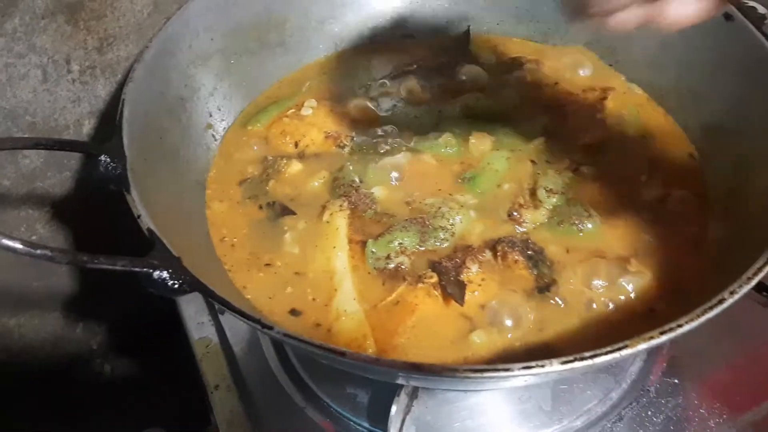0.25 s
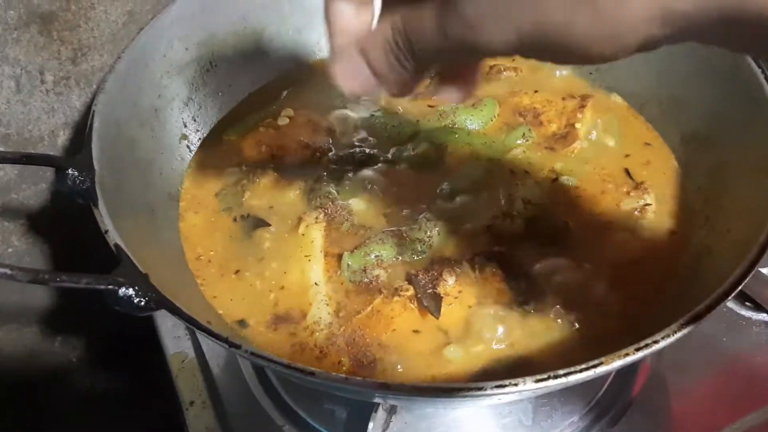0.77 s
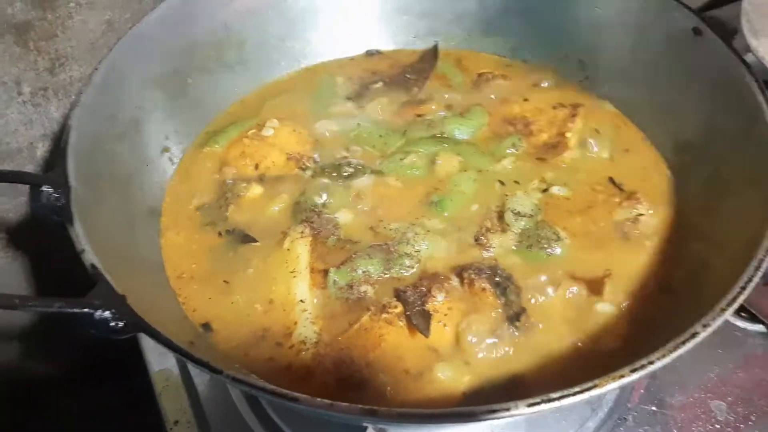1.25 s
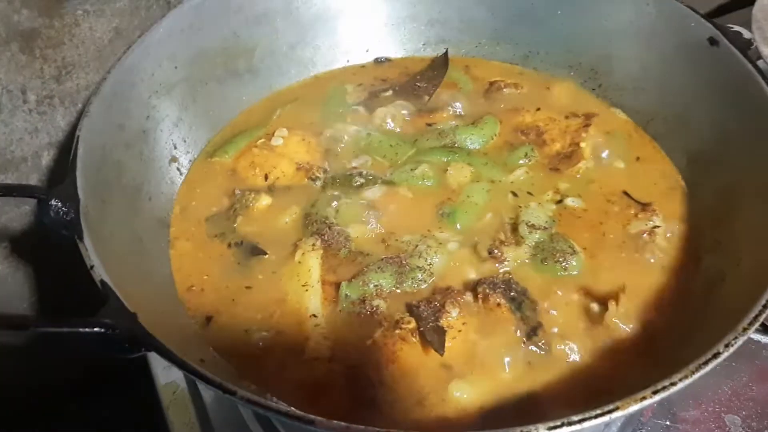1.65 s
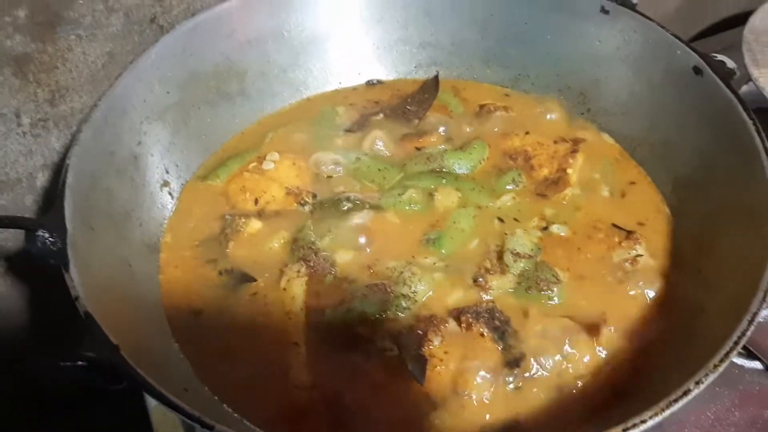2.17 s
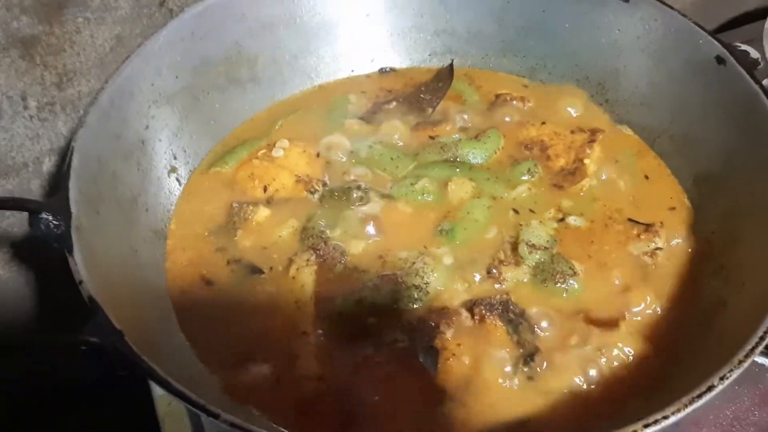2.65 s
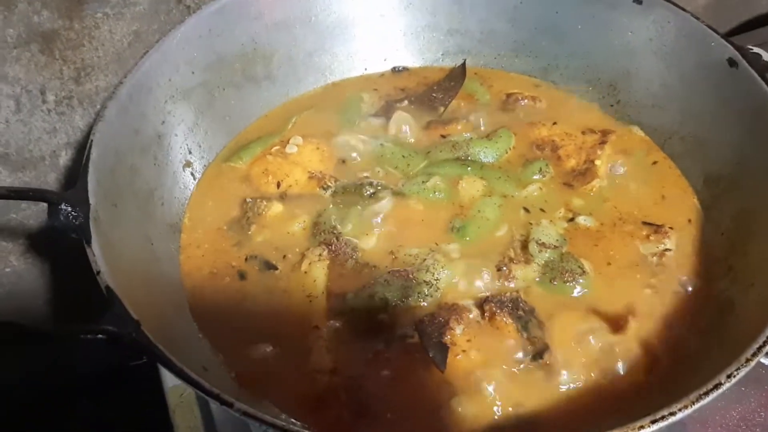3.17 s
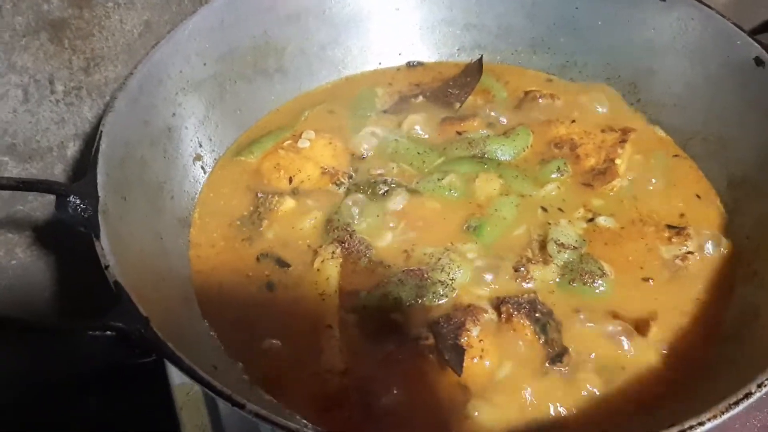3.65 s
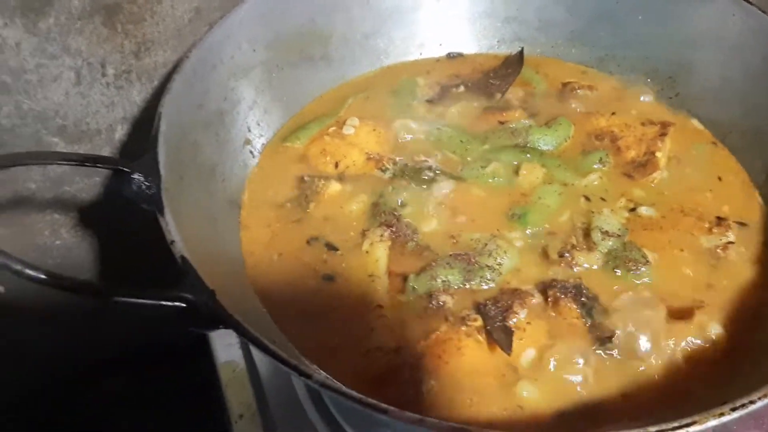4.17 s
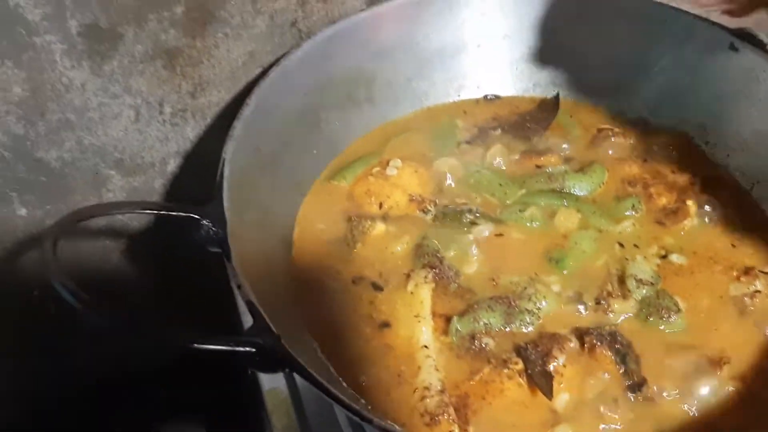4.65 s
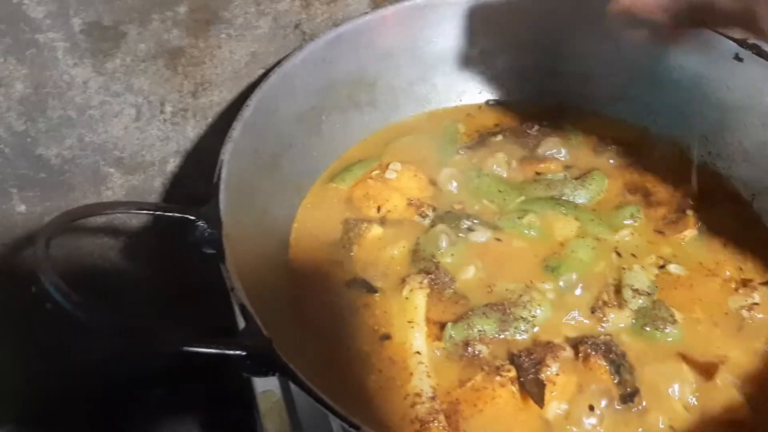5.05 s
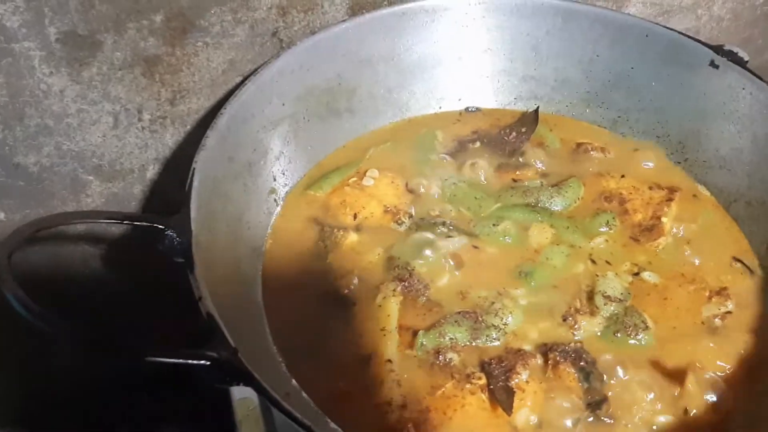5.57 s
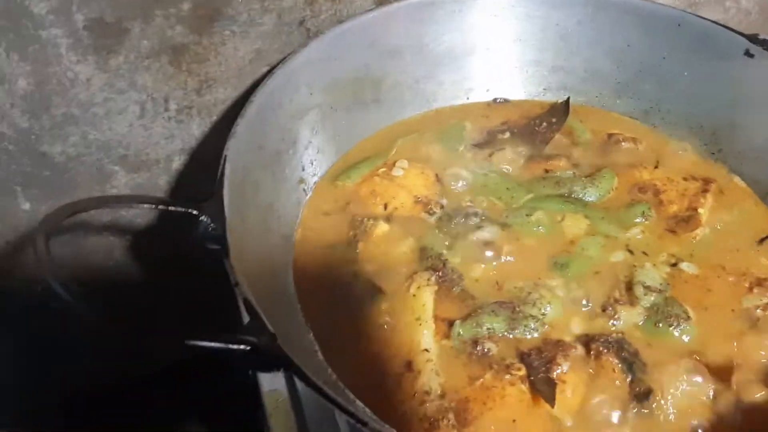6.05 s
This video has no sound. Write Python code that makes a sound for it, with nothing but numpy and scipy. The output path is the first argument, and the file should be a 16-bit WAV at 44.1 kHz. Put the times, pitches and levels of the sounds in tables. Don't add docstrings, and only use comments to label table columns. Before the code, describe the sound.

A thin curry simmers briskly in a steel bowl pan, heard close in stereo for just over six seconds. From the start, dense irregular bubbles burst as short rising plops, some hollow and mid-pitched, others small, high and glassy, each ringing briefly in the bowl. Faint fizzing fills the gaps and a soft, low gas roar hums steadily below. Very sharp, bright spits crack at about 2.2 and 2.3 seconds. Across the softly echoing kitchen, dull knocks fall near 1.9, 3.1 and 3.5 seconds, with a brief buzzy metal clink at 3.2. The hardest knock comes at 4.25. The spitting hiss grows livelier around 4.8 to 5.1, then eases. Between 5.65 and 5.95 low, lumpy puffs of air brush the right microphone. A deep soft knock and a fainter one follow around 6.1, and the bubbling continues to the end.

```python
import sys
import numpy as np
from scipy import signal
from scipy.io import wavfile
from scipy.ndimage import uniform_filter1d

SR = 44100
rng = np.random.default_rng(int(sys.argv[2]) if len(sys.argv) > 2 else 0)


def ratio(d):
    e = np.asarray(d, float) / 20
    return 10 ** e


def log_audio(samples):
    frames = np.atleast_2d(samples).T
    limited = np.clip(frames, -1, 1)
    pcm = np.round(limited * 32767).astype(np.int16)
    wavfile.write(sys.argv[1], SR, pcm)


N = 278258

# t/s, level/dB
SIMMER_VIGOUR = [(0.0, -66.5), (1.83, -67.5), (1.93, -63), (2.35, -65.5), (2.65, -59), (2.95, -60.5),
                 (3.27, -57.5), (4.04, -64), (4.66, -58.5), (4.8, -51.5), (4.94, -53.5), (5.08, -56),
                 (5.22, -63), (5.41, -63.5), (5.76, -59.5), (6.31, -62)]
# t/s, peak level/dB, f/Hz
LOUD_LARGE_BUBBLES = [(0.391, -44, 1090), (0.659, -29.5, 1210), (0.784, -36, 845), (1.117, -34, 855),
                      (1.161, -37, 1090), (1.329, -29, 907), (1.441, -27, 1150), (1.463, -33.5, 918),
                      (1.597, -31.5, 1210), (2.256, -29, 1225), (2.375, -33, 1210), (2.402, -31, 1165),
                      (2.606, -30, 1340), (2.717, -36, 1260), (2.813, -30.5, 1210), (2.94, -29.5, 1013),
                      (3.038, -30, 1010), (3.391, -59, 1210), (3.493, -33, 1280), (3.72, -38, 910),
                      (3.891, -31.5, 1176), (3.992, -33, 920), (4.696, -38, 950), (5.124, -60, 1200),
                      (5.295, -39, 1210), (5.501, -31, 1210), (5.59, -27.5, 1240), (5.95, -29.5, 1120),
                      (6.056, -34, 1030), (6.267, -26.5, 1010),
                      (0.0503, -28, 1900), (0.1858, -27, 2040), (0.22, -25, 1680), (0.2853, -31, 1580),
                 (0.938, -33, 1680), (0.9813, -26, 1650), (1.2141, -32.5, 2030), (1.3823, -29.5, 1930),
                 (1.4098, -27.5, 1680), (1.6192, -29.5, 1850), (1.68, -24, 1880), (2.0268, -31, 2030),
                 (2.284, -31.5, 2040), (2.6226, -22, 1503), (2.7758, -27, 1530), (3.3653, -20.5, 1670),
                 (3.5159, -22.5, 1970), (4.1598, -23, 1780), (4.5024, -31.5, 2040), (4.6217, -30, 1630),
                 (4.673, -32, 1490), (4.8973, -24.5, 1810), (5.1397, -30, 2040), (5.2016, -22.5, 2040),
                 (5.3497, -26.5, 1960), (5.3717, -28, 1880), (5.4675, -27.5, 1960), (5.6471, -24, 1580),
                 (5.8411, -26.5, 1970), (6.1878, -31, 1970)]
# t/s, peak level/dB, f/Hz
SMALL_BUBBLES = [(0.1052, -19, 3380), (0.3653, -26.5, 4620), (0.9433, -35, 3160), (1.4626, -23, 2950),
                 (2.0672, -46, 2660), (2.121, -29, 3970), (2.5027, -23, 4530), (2.7911, -43, 2830),
                 (2.8734, -28, 4200), (2.9444, -24, 3440), (3.0672, -22.5, 4800), (3.2999, -24, 3270),
                 (3.4112, -27, 3580), (3.552, -20, 4800), (3.898, -32, 3100), (4.0432, -28.5, 2580),
                 (4.242, -23.5, 2800), (4.473, -24, 3800), (4.5271, -32, 3870), (4.6214, -20, 4550),
                 (4.7571, -29, 2790), (4.8623, -31, 2920), (4.906, -25, 2560), (4.982, -27, 3260),
                 (5.091, -28, 2640), (5.3834, -22, 2520), (5.4284, -32, 3320), (5.6481, -30, 3630),
                 (5.8415, -18, 2520), (5.9553, -31, 2570)]
# t/s, peak level/dB, f/Hz
SPITTING_DROPS = [(0.9562, -33, 9680), (1.2126, -32.5, 11400), (1.299, -36.5, 6070), (1.4227, -37, 8950),
                  (1.5242, -26.5, 6860), (1.9884, -37, 10800), (2.2393, -14.5, 13800), (2.2987, -18, 10700),
                  (2.465, -31, 6700), (2.578, -24.5, 5900), (3.1682, -43, 5660), (3.3244, -30, 12600),
                  (3.415, -25, 5600), (3.6007, -24.5, 5950), (4.619, -35, 11900), (4.7872, -30, 7100),
                  (5.0539, -28, 6340), (5.1183, -21.5, 6900), (5.2006, -31, 11500), (5.235, -32, 10500),
                  (5.4055, -29, 12200), (5.6002, -31.5, 6600), (5.884, -27.5, 5800), (6.2971, -27, 6420)]
BUBBLES_DB, HISS_DB = -43.5, -60.5
BUBBLES_FOLLOW = .2
SPIT_LAG_S = .0008

# f/Hz, width/Hz, level/dB
BOWL_RINGS = [(910, 19, -24), (1210, 45, -0.5), (1460, 58, 3), (1900, 12, -18), (2040, 42, 5)]
# f/Hz, level/(dB per Hz)
FIZZ_COLOUR = [(240, -44), (400, -0.5), (626, -2.5), (839, -1), (1310, -4.5), (1510, -3), (1990, -4),
               (2180, -10), (3530, -15.5), (4950, -20.5), (8500, -35.5), (11400, -18), (16000, -26.5)]

# t/s, level/dB
FLAME_DRAUGHT = [(0.0, -46), (1.67, -46.5), (1.86, -46), (2.86, -44.5), (3.2, -46), (3.5, -46), (5.45, -45),
                 (5.78, -43.5), (6.31, -48)]
# f/Hz, level/(dB per Hz)
FLAME_ROAR = [(12, -67), (20, -38), (46, -6.5), (75, 1), (125, -2.5), (156, -15), (210, -7), (287, -9.5),
              (435, -12.5), (621, -8.5), (700, -29), (910, -41), (1540, -120)]
# f/Hz, width/Hz, level/dB
FLAME_HUM = [(55.3, 19.4, -4), (80.2, 15.4, 0.5), (114.6, 22, -2.5), (213.6, 27, -2.5), (269, 50, -7),
             (334, 28.5, -6.5), (422.3, 28, -6)]

# t/s, peak level/dB, rise time/s, rattle length/s, depth of tone (extra bass)/dB
KNOCK_BLOWS = [
    (1.899, -27.5, 0.011, 0.02, -5),
    (3.068, -30.5, 0.0037, 0.032, -2),
    (3.541, -26.5, 0.0043, 0.062, 4.5),
    (4.2547, -20.5, 0.0015, 0.039, -2.5),
    (6.094, -27, 0.014, 0.056, 5),
    (6.174, -39, 0.013, 0.0069, -11),
]
# f/Hz, width/Hz, level/dB
BOARD_RINGS = [(228, 19.7, 5.5), (259.7, 12.4, 3), (322.5, 16, 6.5), (427.6, 26, 6), (651, 24.6, 2),
               (780, 12.5, -2), (847, 6.3, -7.5), (1090, 19, -15.5), (1240, 37, -23)]
# f/Hz, level/(dB per Hz)
KNOCK_CRASH = [(88, -51), (150, -22), (182, -25), (217, -44), (328, -65), (514, 8), (649, -22), (790, -2.5),
               (2600, -14), (16000, -38.5)]
SHARP_T60_S, T60_LOST_PER_RISE = 0.43, 18.2
BRIGHT_DB, BRIGHT_PER_PEAK_DB, BRIGHT_PER_DEPTH_DB = -0.5, 0.8247, 0.1748
DULLING_DB_PER_S_OCTAVE = 40

# f/Hz, width/Hz, level/dB
CLINK_RINGS = [(1050, 120, -3), (1620, 240, -4), (2230, 73, 8.5), (2820, 210, -7.5), (3530, 600, -16.5)]
CLINK_S, CLINK_DB, CLINK_HOLD_S = 3.162, -24.5, 0.059

# middle t/s, level/dB, half length/s
PUFF_GUSTS = [
    (5.695, -27.5, 0.028),
    (5.762, -25, 0.0083),
    (5.789, -22, 0.014),
    (5.846, -36, 0.017),
    (5.895, -27.5, 0.035),
    (5.934, -37, 0.03),
]

# f/Hz, likeness (-1 opposite to 1 same)
LEFT_RIGHT_LIKENESS = [(60, 0.85), (130, 1), (290, 0.83), (640, 0.64), (1410, 0.15), (3100, 0.25),
                       (6820, -0.37), (15000, 0.28)]
# f/Hz, level/dB
LEFT_RIGHT_LEAN = [(30, -2), (300, -3.5), (1200, -3), (14000, -2)]
KITCHEN_T60_S, WALL_CUT_HZ = 0.28, 8900


def bursts(rows, cycles, rise, spread_s, swell):
    out = np.zeros((2, N))
    chance = rng.uniform(-1, 1, (len(rows), 3))
    for (s, db, hz), (where, long, up) in zip(rows, chance):
        t = np.arange(round((1.4 * cycles / hz + 2 * spread_s) * SR)) / SR
        arrival_s = spread_s * (1 + where * np.array([[1], [-1]]))
        age = np.maximum(t - arrival_s, 0) * hz
        fade = ratio(-60 * age / (cycles * ratio(2.75 * long)))
        onset = 1 - np.exp(-age / swell)
        tone = np.sin(2 * np.pi * age * (1 + rise * (1 + up) * age))
        add(out, s - spread_s, ratio(db) * sides(-2.4 - 1.0 * where) * fade * onset * tone)
    return out


def unseen_bubbles(level_db, per_s, low_hz, high_hz, spread_db):
    gaps, pitch, strength = rng.random((1500, 3)).T
    s = .01 + np.cumsum(-np.log(1 - gaps)) / per_s
    simmer_db = level_db[np.minimum(s * SR, N - 1).astype(int)]
    db = simmer_db + spread_db * np.minimum(-np.log(1 - strength), 2.0)
    hz = low_hz * (high_hz / low_hz) ** pitch
    return np.transpose([s, db, hz])[s < (N - 1) / SR]


def in_bowl(x, loud, ring_db):
    right_rings = np.array(BOWL_RINGS) * [1.015, 1, 1]
    rings = np.array([resonances(loud[0], BOWL_RINGS), resonances(loud[1], right_rings)])
    x = x + loud
    echo = np.array([np.roll(x[1], round(.0031 * SR)), -np.roll(x[0], round(.0043 * SR))])
    return x + ratio(ring_db) * rings + ratio(-14.5) * echo


def splashes(rows, hz, t60, octaves):
    s, db, burst_hz = np.transpose(rows)
    nearness = np.exp(-.5 * (np.log2(burst_hz / hz) / octaves) ** 2)
    jumps = np.full(N, 1e-18)
    jumps[(s * SR).astype(int)] = ratio(db) * nearness
    return signal.lfilter([1], [1, -ratio(-60 / (t60 * SR))], jumps)


def fizz(rows, bubbles_db, hiss_db):
    grain = drift(53)
    seethe, hiss, rows = ratio(bubbles_db - 6.5), ratio(hiss_db + 12), np.array(rows)

    def shape(hz):
        spray_db = np.interp(np.log2(hz / 1000), [0, 1, 2, 3, 4], [-12, -16, -9.5, -12, -10])
        spray = splashes(rows, hz, t60=0.14, octaves=.35 if hz < 5000 else .7)
        steady = seethe if hz < 4500 else hiss
        return (steady + ratio(spray_db) * spray) * ratio(0.12 * grain + 2.6 * drift(8.3))
    return banded_noise(FIZZ_COLOUR, shape)


def flame(level_db):
    breath = drift(4)
    roar = banded_noise(FLAME_ROAR, lambda hz: ratio(.8 * breath + 1.5 * drift(10)))
    shared, *own = rng.standard_normal((3, N))
    feed = shared + 0.14 * np.array(own)
    hum = rms_one(resonances(resonances(feed, FLAME_HUM), FLAME_HUM)) * sides(-2.5)
    return ratio(level_db) * (ratio(-0.5) * roar + ratio(-0.5 + breath) * hum)


def knocks():
    out, t = np.zeros((2, N)), np.arange(round(.36 * SR)) / SR
    for s, db, rise_s, rattle_s, depth_db in KNOCK_BLOWS:
        t60 = SHARP_T60_S - T60_LOST_PER_RISE * rise_s
        bright_db = BRIGHT_DB + BRIGHT_PER_PEAK_DB * (db + 28) + BRIGHT_PER_DEPTH_DB * depth_db

        def fall(hz):
            fade_db = -60 * np.maximum(t - rattle_s, 0) / (t60 * (500 / hz) ** 0.16)
            return np.minimum(t / rise_s, 1) * ratio(fade_db)

        lumps = ratio(2.0 * rms_one(uniform_filter1d(rng.standard_normal(len(t)), size=200)))
        crash = banded_noise(KNOCK_CRASH, lambda hz: lumps * fall(hz) * ratio(bright_db * np.log2(hz / 500) / 2),
                             size=len(t))
        modes = [(hz, 1.46 * width, level_db + depth_db * (hz < 290)) for hz, width, level_db in BOARD_RINGS]
        shared, *own = rng.standard_normal((3, len(t))) * lumps
        own = signal.sosfilt(signal.butter(4, 600, "high", fs=SR, output="sos"), own)
        jolts = (shared + ratio(3) * own) * fall(300) * (1 + .9 * np.exp(-t / .018))
        jolts[:, round(.002 * SR)] += 22
        ring = 0
        for k, mode in enumerate(modes):
            dulling = ratio(-DULLING_DB_PER_S_OCTAVE * t * np.log2(mode[0] / 300))
            ring = ring + (-1) ** k * resonances(jolts, [mode]) * dulling
        ring = ring / np.std(resonances(shared, modes))
        add(out, s, ratio(db) * (ring * sides(-2.5) + ratio(-6.0) * crash * sides(-1.2)))
    return out


def clink():
    out, t = np.zeros((2, N)), np.arange(round(.2 * SR)) / SR
    buzz = rms_one(resonances(rng.standard_normal((2, len(t))), CLINK_RINGS))
    level_db = CLINK_DB - 60 * np.maximum(t - CLINK_HOLD_S, 0) / 0.18 - 210 * t
    add(out, CLINK_S, ratio(level_db) * sides(-2.7) * buzz)
    return out


def puff():
    t = np.arange(N) / SR
    gusts = sum(ratio(db) * np.exp(-((t - s) / half_s) ** 2) for s, db, half_s in PUFF_GUSTS)
    low = signal.sosfilt(signal.butter(3, [70, 180], "band", fs=SR, output="sos"), rng.standard_normal(N))
    low = low / np.sqrt(uniform_filter1d(low ** 2, size=500))
    return low * gusts * ratio(np.array([[-22], [3]]))


def kitchen(x):
    out, dull = np.zeros((2, N)), np.exp(-2 * np.pi * WALL_CUT_HZ / SR)
    for k, lag in enumerate(rng.integers(500, 1500, 10)):
        loop, gain, state = x.copy(), ratio(-60 * lag / SR / KITCHEN_T60_S), [0.]
        for i in range(lag, N, lag):
            back, state = signal.lfilter([gain * (1 - dull)], [1, -dull], loop[i - lag:i], zi=state)
            loop[i:i + lag] += back[:N - i]
        out[k % 2] += (loop - x) * (-1) ** (k // 2)
    return out


def rms_one(x):
    return x / np.sqrt(np.mean(x ** 2) + 1e-20)


def in_time(rows):
    s, *columns = np.transpose(rows)
    return [np.interp(np.arange(N) / SR, s, c) for c in columns]


def at_hz(points, hz):
    table_hz, values = np.array(points).T
    return np.interp(np.log(hz), np.log(table_hz), values)


def sides(lean_db):
    return ratio(np.array([[.5], [-.5]]) * lean_db)


def drift(rate):
    r = np.exp(-80 * np.pi * rate / SR)
    slow = signal.lfilter([1], [1, -2 * r, r * r], rng.standard_normal(N // 40 + 2002))[2000:]
    return np.interp(np.arange(N) / 40, np.arange(len(slow)), rms_one(slow))


def resonances(x, peaks):
    out = 0
    for k, (hz, width, db) in enumerate(peaks):
        r = np.exp(-np.pi * width / SR)
        b = np.array([1, 0, -1]) * (1 - r * r) / 2
        a = [1, -2 * r * np.cos(2 * np.pi * hz / SR), r * r]
        out = out + (-1) ** k * ratio(db) * signal.lfilter(b, a, x + 1e-18)
    return out


def banded_noise(spectrum, shape, size=N):
    edges = 24 * 2 ** np.arange(0, 9.6, .5)
    out, white, power = 0, rng.standard_normal((2, 2, size)), 0
    for k, (low, high) in enumerate(zip(edges, edges[1:])):
        hz = np.sqrt(low * high)
        if not spectrum[0][0] < hz < spectrum[-1][0]:
            continue
        mid, side = signal.sosfilt(signal.butter(2, [low, high], "band", fs=SR, output="sos"), white[k % 2])
        alike = np.clip(at_hz(LEFT_RIGHT_LIKENESS, hz), -1, 1)
        stereo = np.sqrt(1 + alike) * mid + np.sqrt(1 - alike) * side * [[1], [-1]]
        band = ratio(at_hz(spectrum, hz)) * stereo
        out = out + band * (sides(at_hz(LEFT_RIGHT_LEAN, hz)) * shape(hz))
        power += np.mean(band ** 2)
    return out / np.sqrt(power)


def add(out, s, sound):
    i = round(s * SR)
    out[:, i:i + sound.shape[1]] += sound[:, :N - i]


def scene():
    vigour_db, = in_time(SIMMER_VIGOUR)
    vigour_db = vigour_db - vigour_db.mean()
    bubbles_db, hiss_db = BUBBLES_DB + BUBBLES_FOLLOW * vigour_db, HISS_DB + vigour_db

    plops = [*LOUD_LARGE_BUBBLES,
             *unseen_bubbles(bubbles_db + 7.0, 22.0, 822, 2106, spread_db=2.5)]
    blips = [*SMALL_BUBBLES, *unseen_bubbles(bubbles_db + 5.5, 14.0, 2550, 3780, spread_db=2.0)]
    faint_plops = unseen_bubbles(bubbles_db + 2.5, 120, 786, 2225, spread_db=3.5)
    faint_blips = unseen_bubbles(bubbles_db - 4.5, 110, 2410, 6620, spread_db=5.0)
    faint_spits = unseen_bubbles(hiss_db + 11.5, 80, 4540, 11200, spread_db=3.5)
    cracks = np.add([*SPITTING_DROPS, *faint_spits], [SPIT_LAG_S, 0, 0])

    large = bursts(plops, cycles=28.6, rise=0.0038, spread_s=.0001, swell=0.92)
    murmur = bursts(faint_plops, cycles=15.9, rise=0.0069, spread_s=.0001, swell=0.55)
    small = bursts([*blips, *faint_blips], cycles=24.8, rise=0.0013, spread_s=0.00019, swell=1.85)
    drops = bursts(cracks, cycles=13.1, rise=0.0032, spread_s=0.00019, swell=0.57)
    pan = in_bowl(ratio(2.5) * murmur + ratio(3) * small + ratio(5.5) * drops, ratio(2.5) * large, ring_db=0)

    spray = fizz([*plops, *blips, *SPITTING_DROPS, *faint_blips, *faint_spits], bubbles_db, hiss_db)
    burner = flame(in_time(FLAME_DRAUGHT)[0] + 1.2)
    far = knocks()
    room = kitchen(ratio(-12.0) * pan.mean(0) + ratio(-16) * far.mean(0))
    return pan + spray + burner + far + clink() + puff() + room


def band_limit(x):
    return signal.sosfilt(signal.butter(12, 16510, fs=SR, output="sos"), x)


def record(dry):
    top_cut = signal.cheby2(22, 60, 16050, fs=SR, output="sos")
    mix = signal.sosfilt(top_cut, dry)
    return band_limit(mix)


dry = scene()
out = record(dry)
log_audio(out)
```